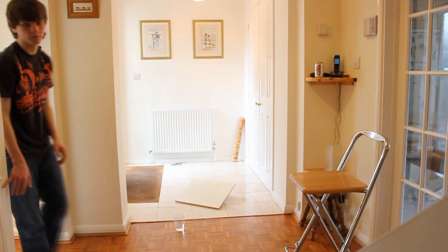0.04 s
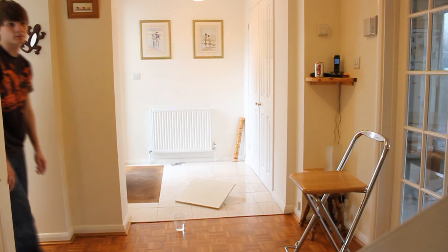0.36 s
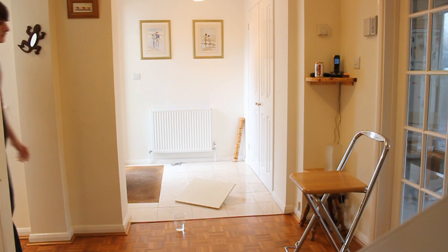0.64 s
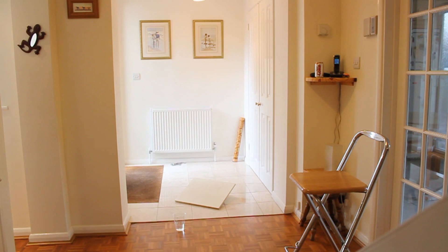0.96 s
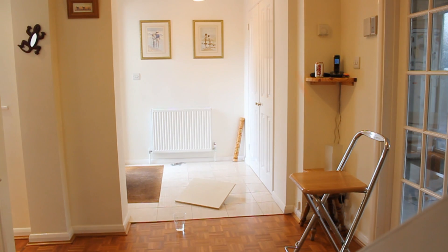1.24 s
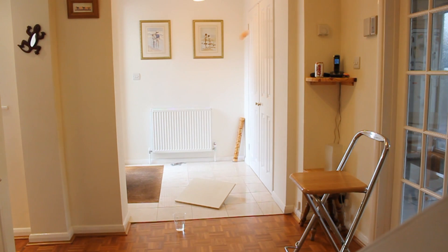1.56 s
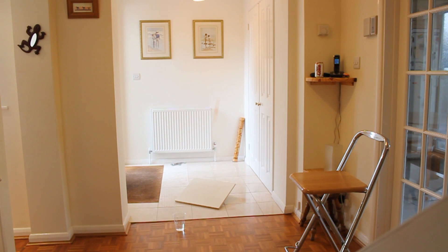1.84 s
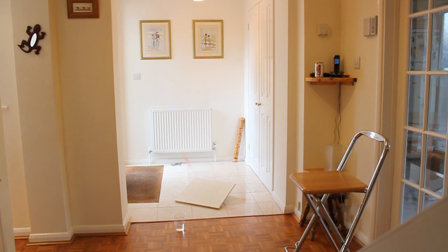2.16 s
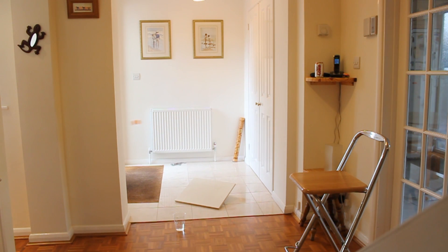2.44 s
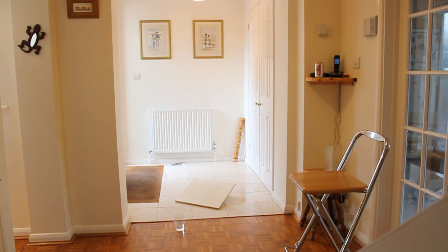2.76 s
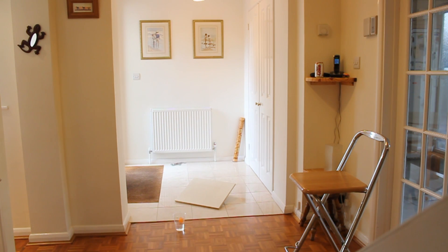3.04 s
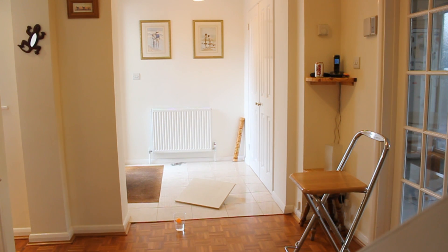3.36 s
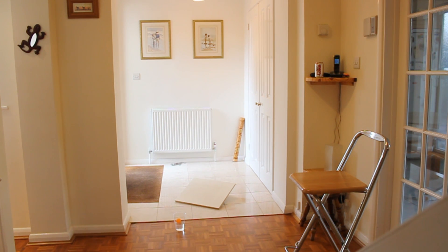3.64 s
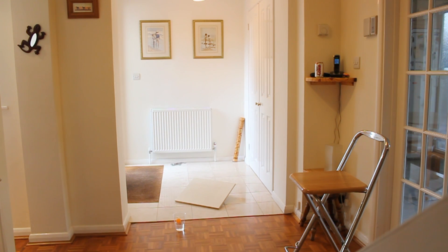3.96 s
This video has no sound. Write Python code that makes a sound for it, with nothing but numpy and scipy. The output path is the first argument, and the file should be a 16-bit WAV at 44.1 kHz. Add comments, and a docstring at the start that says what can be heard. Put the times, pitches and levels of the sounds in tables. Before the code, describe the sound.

A table tennis ball clicks sharply off a door, a floor board and a wall, then lands in a cup. Faint steps and rustling clothes come first. Each click echoes briefly in a bare hall over low hum and hiss.

```python
"""A bare tiled hall: a table tennis ball, thrown in through the doorway, strikes a door, a board on the
floor and a wall, then lands in a cup. Each impact snaps the thin shell and excites the modes of the
surface; the click reverberates in the hall and drives the recorder's limiter down. Beforehand a noise
dies away, the thrower steps off, clothes rustling by friction, and a faint tone sounds.
Hum and hiss lie beneath."""
import sys
import numpy as np
from scipy import signal
from scipy.fft import rfft, irfft, next_fast_len
from scipy.io import wavfile
from scipy.ndimage import uniform_filter1d

SR = 44100
rng = np.random.default_rng(int(sys.argv[2]) if len(sys.argv) > 2 else 0)


def put_to_file(sound):
    """Save the sound as 16-bit audio at rate SR, in the file named by the first command-line argument."""
    columns = np.atleast_2d(sound).T  # one column per channel
    safe = np.clip(columns, -1, 1)
    whole_steps = np.round(safe * 32767)
    wavfile.write(sys.argv[1], SR, whole_steps.astype(np.int16))


N = 176400
T = np.arange(N) / SR

# Partials of the hum: pitch_hz, level_db
HUM_PARTIALS = [(48, -80), (59, -66), (99, -69.5)]
# Spectrum of the hiss: frequency_hz, gain_db
HISS_SPECTRUM = [(15, -31.5), (25, -13), (55, 3.5), (75, -22.5), (169, -8.5), (331, -12), (509, -11),
                 (631, -17.5), (848, -12.5), (1340, -18), (15500, -31.5)]
# Envelope of the hiss: time_s, level_db
HISS_ENVELOPE = [(.2, -51.5), (1.9, -53), (3.8, -55.5)]
# Soft thuds, a noise dying away as the recorder starts, then steps and scuffs:
# start_s, level_db, upper_edge_hz
SOFT_THUDS = [(.125, -42.5, 2600), (.33, -39, 1100), (1.088, -38.5, 600), (1.158, -43.5, 800)]
# Envelopes of the clothes, then of a last swish of a sleeve: time_s, rub_db, swish_db
CLOTH_ENVELOPE = [(0.13, -48, -66), (0.244, -52.5, -59), (0.276, -50, -51), (0.33, -49.5, -57),
                  (0.554, -60.5, -66), (0.572, -62, -52.5), (0.614, -60, -63), (0.676, -73, -62),
                  (0.706, -50.5, -48), (0.736, -44.5, -48), (0.806, -49.5, -54.5), (0.872, -49.5, -44.5),
                  (0.932, -52.5, -51), (1.088, -51, -58.5), (1.13, -48, -51), (1.21, -53, -51)]
SLEEVE_ENVELOPE = [(1.55, -60, -66), (1.66, -57, -51.5), (1.78, -63.5, -69.5), (2.201, -68.5, -77)]
# Spectra of the cloth's low rub and high swish: frequency_hz, gain_db
RUB_SPECTRUM = [(300, -4.5), (1000, -3), (2300, 0.5), (4500, -4.5), (7000, -13.5), (15800, -30)]
SWISH_SPECTRUM = [(2000, -17), (5000, 1), (8000, -3), (11000, -0.5), (15800, -7.5)]
# Impacts on door, board, wall and cup: start_s, level_db, crack_db, modes_db, t60_factor, build_s
IMPACTS = [(1.2281, -4.5, 15, -10, 1.0, 0.0083), (2.165, -0.5, 24.5, -12, 1.0, 0.0062),
           (2.6302, -13.5, 24.5, -20.5, 0.9, 0.0077), (2.9999, -1, 19.5, -5.5, 0.98, 0.0026)]
# Spectrum of the click on each surface: frequency_hz, gain_db
DOOR_SPECTRUM = [(100, -37.5), (240, -12), (500, -15), (700, -7.5), (840, -8), (1030, -0.5), (1170, -3),
                 (1550, -2.5), (2600, -7.5), (5000, -13.5), (7700, -17), (8950, -11), (9600, -15),
                 (10400, -8), (11200, -11), (12000, -2.5), (13400, -4), (14200, -11), (15800, -10)]
BOARD_SPECTRUM = [(100, -30), (250, -10), (400, -8.5), (750, -2.5), (1400, -1), (2300, -4), (2750, -13),
                  (4000, -14.5), (5500, -21.5), (8100, -22), (9100, -13), (9700, -23.5), (10500, -9.5),
                  (11600, -17), (12500, -11.5), (15800, -21.5)]
WALL_SPECTRUM = [(100, -38.5), (300, -12.5), (600, -5), (900, -0.5), (1700, 3), (2700, 2), (4300, -3),
                 (7000, -15), (8600, -7), (9130, 2), (9500, -7), (12400, 2.5), (13800, -0.5), (15800, -4.5)]
CUP_SPECTRUM = [(100, -30), (260, -11.5), (450, -11), (780, -0.5), (1100, -2), (1750, -3), (2150, -2.5),
                (2470, 4.5), (2800, -1), (4100, -6.5), (4650, -2.5), (5000, -3.5), (5550, -2.5),
                (6350, -6.5), (7200, -12.5), (10000, -17), (13000, -18.5), (15800, -25)]
# Modes heard at each impact: of the surface and the hall around it, and above about 9 kHz of the ball's thin
# shell: pitch_hz, level_db
DOOR_RESONANCES = [(434, -11), (685, -11), (717, -11), (944, -9), (1024, -4), (1046, -1), (1293, -9),
                   (1465, -7), (1555, -4), (1769, -8), (2238, -9), (5100, -15), (9000, -16), (13075, -7)]
BOARD_RESONANCES = [(398, -1), (438, -8), (552, -6), (735, -1), (884, -2), (1038, -4), (1162, -7),
                    (1331, 0), (1356, -6), (1606, -3), (1669, -2), (1860, -9), (1998, -1), (2288, -6)]
WALL_RESONANCES = [(1094, -8), (1593, -6), (1829, -6), (2450, -7), (2612, -7), (3739, -9), (5998, -12),
                   (9147, -1), (10844, -7), (12486, -3), (13900, -7)]
CUP_RESONANCES = [(535, -12), (761, -10), (852, -11), (1139, -11), (1358, -12), (1768, -13), (2476, -7),
                  (2497, -9), (3200, -15), (3617, -14), (3831, -15), (4391, -15), (4650, -14), (5590, -15),
                  (5680, -14), (6308, -14)]
# Ping of the shell or the cup, one per impact: pitch_hz, level_db, t60_s
IMPACT_PINGS = [(13460, 7.5, 0.0048), (12200, -2, 0.0083), (9290, -2.5, 0.042), (2459, -7, 0.1336)]
# Reverberation time of the hall, before an impact's t60_factor: frequency_hz, t60_s
HALL_DECAY = [(150, 0.59), (400, 0.69), (1000, 0.7), (2500, 0.59), (5000, .55), (9000, .42), (13000, 0.32),
              (16000, 0.2)]
# Distinct wall reflections: delay_s, level_over_tail_db
WALL_ECHOES = [(.0055, 6.5), (0.0163, 9), (0.032, 13.5), (.062, 14.5)]


def from_db(db):
    """Amplitude grows tenfold for every 20 dB."""
    return 10 ** (np.asarray(db) / 20)


def unit_rms(x):
    """Division by the root mean square gives unit power."""
    return x / np.sqrt(np.mean(x ** 2) + 1e-20)


def at_hz(points, hz):
    """Interpolation on a logarithmic frequency axis."""
    frequencies, values = np.transpose(points)
    return np.interp(np.log(np.maximum(hz, 1)), np.log(frequencies), values)


def decay(t60_s):
    """One second of exponential damping, 60 dB down at t60_s."""
    return np.exp(-np.log(1000) * T[:SR] / t60_s)


def build_up(time_constant_s):
    """One second of exponential approach to full amplitude."""
    return 1 - np.exp(-T[:SR] / time_constant_s)


def add(out, start_s, x):
    """Superposition of x on out, from start_s."""
    i = int(start_s * SR)
    out[i:i + len(x)] += x[:N - i]


def coloured(x, spectrum, modes=(), peak_db=3.5):
    """Minimum-phase filtering at unit energy, with a resonance peak at each mode."""
    n = 2 * next_fast_len(len(x) // 2 + 4096, True)
    hz = np.fft.rfftfreq(n, 1 / SR)
    peaks = sum(np.exp(-((hz - mode_hz) / (14 + 0.017 * mode_hz)) ** 2) for mode_hz, _ in modes)
    gain = unit_rms(from_db(at_hz(spectrum, hz) + peak_db * np.minimum(peaks, 1)))
    cepstrum = irfft(np.log(gain))
    cepstrum[1:n // 2] *= 2  # folding onto positive time makes the filter causal
    cepstrum[n // 2 + 1:] = 0
    return irfft(rfft(x, n) * np.exp(rfft(cepstrum)))[:len(x)]


def hum_and_hiss():
    """The noise floor of the house: a line spectrum of low hum on a continuous one of hiss."""
    hum = sum(from_db(db) * np.sqrt(2) * np.sin(2 * np.pi * (hz * T + rng.random()))
              for hz, db in HUM_PARTIALS)
    hiss = coloured(rng.standard_normal(N), HISS_SPECTRUM)
    return hum + from_db(np.interp(T, *np.transpose(HISS_ENVELOPE))) * hiss


def thuds(lower_edge_hz=170, attack_s=0.012):
    """Reverberation blurs each soft thud into a decaying band of noise."""
    out = np.zeros(N)
    for start_s, db, upper_edge_hz in SOFT_THUDS:
        band = signal.butter(2, [lower_edge_hz, upper_edge_hz], "band", fs=SR, output="sos")
        thud = unit_rms(signal.sosfilt(band, rng.standard_normal(SR)))
        add(out, start_s, from_db(db) * thud * build_up(attack_s) * decay(t60_s=0.42))
    return out


def clothes(grain_db=1, grain_s=0.0053, trim_db=-0.5):
    """Friction of cloth makes grainy noise whose amplitude follows the thrower's movement."""
    times_s, rub_db, swish_db = np.transpose(list(CLOTH_ENVELOPE) + list(SLEEVE_ENVELOPE))
    roughness = unit_rms(uniform_filter1d(rng.standard_normal(N), int(grain_s * SR)))
    grain = from_db(grain_db * roughness)
    out = np.zeros(N)
    for db, spectrum in ((rub_db, RUB_SPECTRUM), (swish_db, SWISH_SPECTRUM)):
        friction = unit_rms(coloured(rng.standard_normal(N) * grain, spectrum))
        out += from_db(np.interp(T, times_s, db) + trim_db) * friction
    return out


def faint_tone(start_s=0.54, end_s=0.78, pitch_hz=437, level_db=-54.5):
    """A pure tone swells and fades between the steps under a half-sine envelope."""
    envelope = np.sin(np.pi * np.clip((T - start_s) / (end_s - start_s), 0, 1))
    return from_db(level_db) * envelope * np.sin(2 * np.pi * pitch_hz * T)


def shell_crack(edge_hz=4800, bass_cut_share=0.76):
    """Direct sound: the thin shell's brief snap radiates a broad, bright spectrum."""
    burst = rng.choice([-1, 1], SR) * decay(t60_s=0.022)
    burst = burst / np.linalg.norm(burst) + 1e-18
    lows = signal.lfilter(*signal.butter(1, edge_hz, fs=SR), burst)
    return burst - bass_cut_share * lows


def ping(pitch_hz, level_db, t60_s):
    """Free vibration of one strongly damped mode of the shell or the cup."""
    return from_db(level_db) * np.sin(2 * np.pi * pitch_hz * T[:SR]) * decay(t60_s)


def reverberation(t60_factor, build_s, ripple_db=2.39, ripple_spacing_hz=110.86):
    """Distinct reflections stand in a diffuse field of random phase, whose treble decays first."""
    hz = np.fft.rfftfreq(SR, 1 / SR)
    arrivals = np.sqrt(SR) * irfft(np.exp(2j * np.pi * rng.random(len(hz))))
    for delay_s, db in WALL_ECHOES:
        arrivals[int(delay_s * SR)] += from_db(db)
    ripple = np.interp(hz / ripple_spacing_hz, np.arange(len(hz)), rng.standard_normal(len(hz)))
    spectrum = rfft(arrivals) * from_db(ripple_db * ripple)  # the hall favours some pitches
    centres_hz = np.geomspace(150, 16000, 16)
    tail = np.zeros(SR)
    for centre_hz, weights in zip(centres_hz, np.eye(len(centres_hz))):
        band = irfft(spectrum * np.interp(hz, centres_hz, weights))
        tail += band * decay(t60_factor * at_hz(HALL_DECAY, centre_hz))
    return tail * build_up(build_s)


def ringing(modes, build_s=0.016):
    """Normal modes swell as the hall fills and decay at its reverberation time."""
    tones = np.zeros(SR)
    for hz, db in modes:
        tone = np.sin(2 * np.pi * (hz * T[:SR] + rng.random()))
        tones += from_db(db) * tone * decay(at_hz(HALL_DECAY, hz))
    return tones * build_up(build_s)


def ball():
    """Impact excitation: each surface filters the crack and its reverberation, and its modes ring."""
    out = np.zeros(N)
    spectra = DOOR_SPECTRUM, BOARD_SPECTRUM, WALL_SPECTRUM, CUP_SPECTRUM
    resonances = DOOR_RESONANCES, BOARD_RESONANCES, WALL_RESONANCES, CUP_RESONANCES
    for impact, spectrum, modes, ping_mode in zip(IMPACTS, spectra, resonances, IMPACT_PINGS):
        start_s, level_db, crack_db, modes_db, t60_factor, build_s = impact
        excitation = from_db(crack_db) * shell_crack() + reverberation(t60_factor, build_s)
        click = coloured(excitation, spectrum, modes)
        ring = from_db(modes_db) * ringing(modes) + ping(*ping_mode)
        add(out, start_s, from_db(level_db) * (click + ring))
    return out


def midrange_swell(x, centre_s=1.369, width_s=0.0077, boost_db=4.5):
    """Amplitude modulation of one band: the midrange of the first impact's tail rises briefly."""
    midrange = signal.sosfilt(signal.butter(1, [700, 2300], "band", fs=SR, output="sos"), x)
    window = np.exp(-((T - centre_s) / width_s) ** 2)
    return x + (from_db(boost_db) - 1) * window * midrange


def scene():
    """The pressures of all sources add linearly at one microphone."""
    return (midrange_swell(ball()) + thuds() + clothes() + faint_tone() + hum_and_hiss())[None]


def record(dry, start_s=0.121, threshold_db=-13, release_db_per_s=61.5):
    """Limiting: once the recorder starts, peaks cut its gain, which recovers slowly; overshoots clip."""
    x = dry[0] * (T > start_s)
    detector_s, attack_s = 0.0023, 0.0036
    detector_pole, attack_pole = np.exp(-1 / (SR * np.array([detector_s, attack_s])))
    power = signal.lfilter([1 - detector_pole], [1, -detector_pole], x ** 2)
    excess_db = np.maximum(10 * np.log10(power + 1e-12) - threshold_db, 0)
    release_db = release_db_per_s * T
    held_db = np.maximum.accumulate(excess_db + release_db) - release_db
    reduction_db = signal.lfilter([1 - attack_pole], [1, -attack_pole], held_db)
    limited = np.clip(x * from_db(-reduction_db), -1, 1)
    low_cut = signal.butter(2, 51, "high", fs=SR, output="sos")
    high_cut = signal.ellip(10, 0.2, 80, 15900, fs=SR, output="sos")
    return signal.sosfilt(high_cut, signal.sosfilt(low_cut, limited))[None]


dry = scene()
out = record(dry)
put_to_file(out)
```